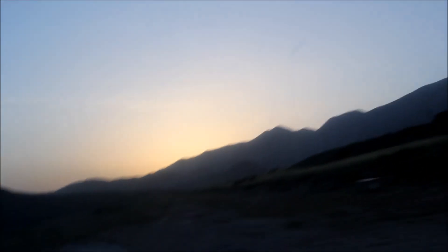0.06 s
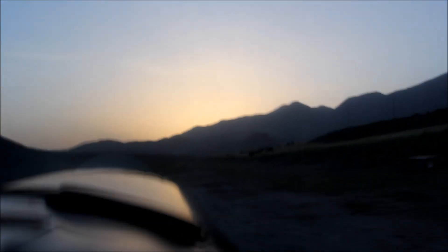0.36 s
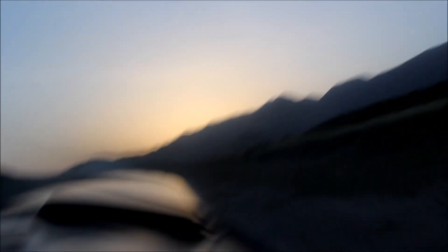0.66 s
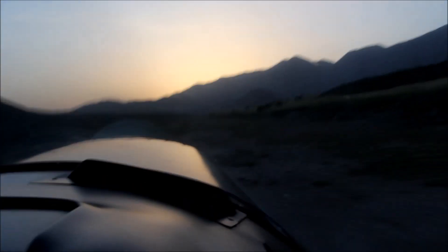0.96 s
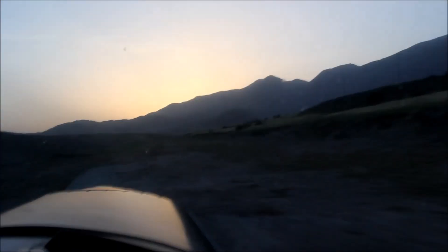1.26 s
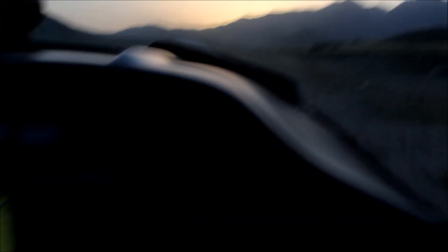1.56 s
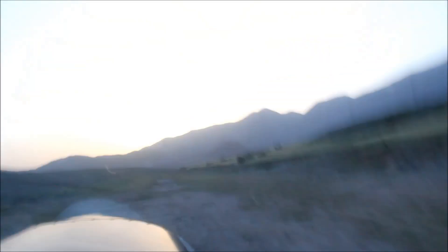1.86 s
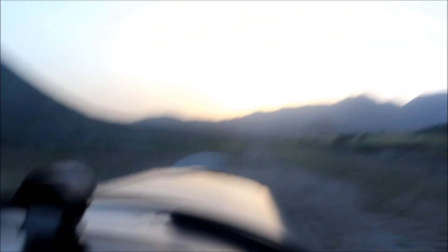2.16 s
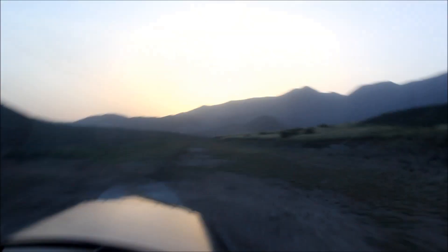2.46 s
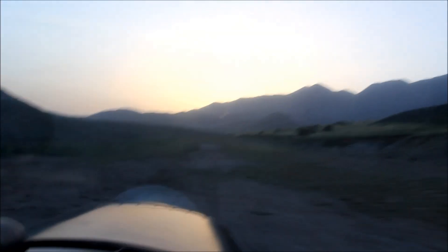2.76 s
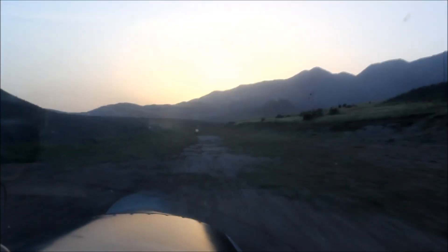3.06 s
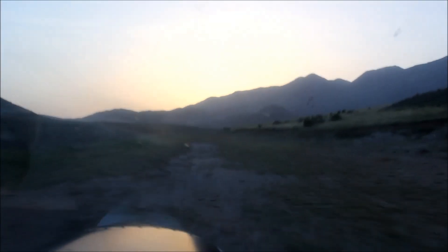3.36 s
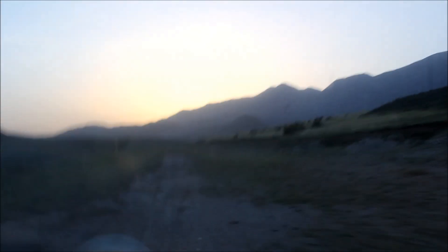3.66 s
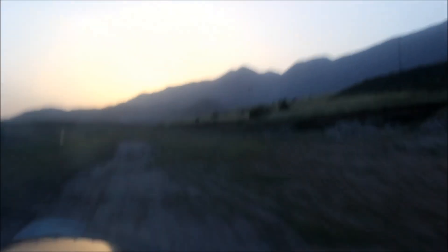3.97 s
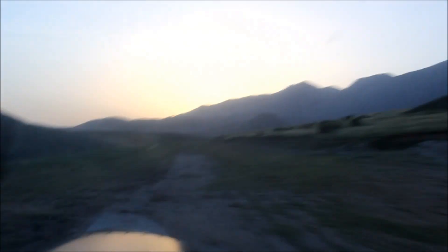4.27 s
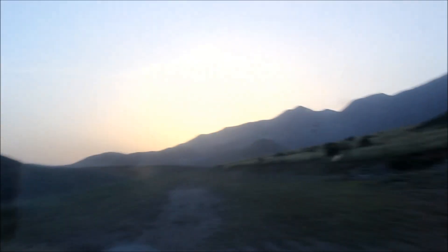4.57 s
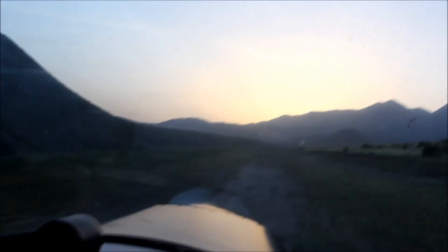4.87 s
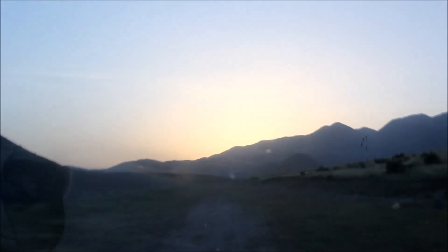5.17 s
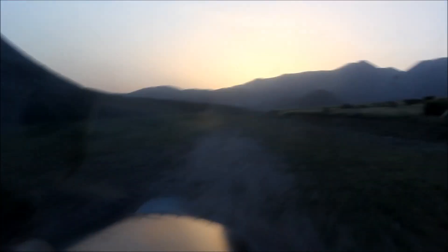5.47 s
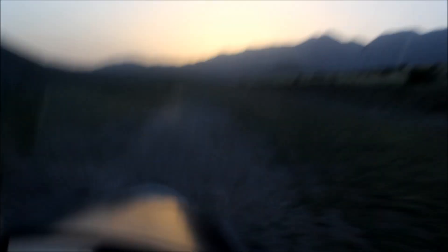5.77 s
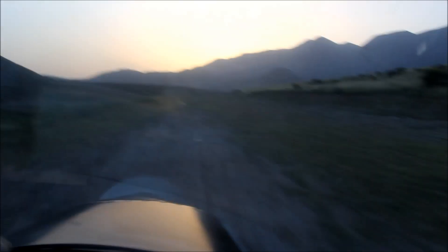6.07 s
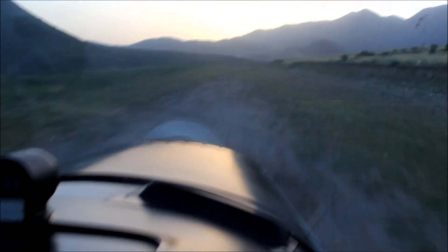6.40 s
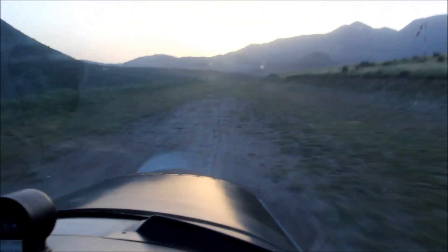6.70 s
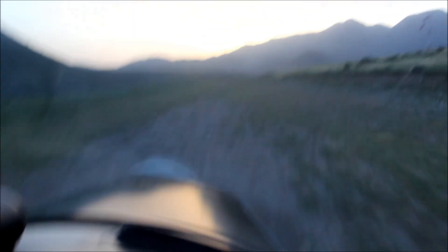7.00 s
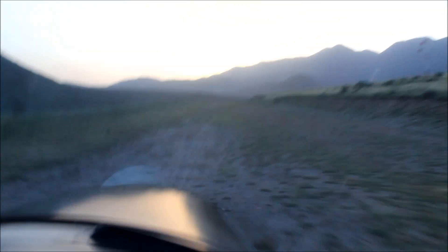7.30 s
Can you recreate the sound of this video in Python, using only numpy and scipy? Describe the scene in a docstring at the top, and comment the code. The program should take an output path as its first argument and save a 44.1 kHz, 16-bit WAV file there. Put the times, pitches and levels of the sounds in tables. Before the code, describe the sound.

A low, booming rumble fills the cabin of a light aircraft rolling over rough grass, heard from the seat for about seven seconds. The throttled-back engine throbs within it, while air and grass rush along the fuselage. At 0.2 seconds the landing gear thumps, with panel knocks and a short buzz. Loose fittings clack rapidly and unevenly until about 2.8 seconds, with more gear thumps at 1.3 and 2.1. A deep boom swells near 0.5, 1.4 and 2.2 seconds, and a gap whistles faintly between 0.6 and 2.1. The rattles thin around 3 seconds as the rumble continues, then pick up after 4. Dull panel knocks come in a quick run from 4.6 to 5.6 seconds, ending in a thump and buzz. More knocks follow at 6, then lighter clacks and a last thump at 7.2. Grit ticks faintly under the wheels in patches throughout.

```python
"""The cabin of a light aircraft rumbles and booms as it rolls over a rough grass strip, throttled back.
Jolts from the wheels and the firings of four unequal cylinders ring the cabin's resonances, and the
deepest one swells when the airframe heaves. Loose fittings clack, often in step with the engine,
panels knock and buzz, and the landing gear thumps over bumps. Behind it all, air and grass rush
along the fuselage, a gap whistles faintly and grit ticks under the wheels."""
import sys
import numpy as np
from scipy import signal
from scipy.fft import rfft, irfft, next_fast_len
from scipy.io import wavfile
from scipy.ndimage import uniform_filter1d

SR = 44100
rng = np.random.default_rng(int(sys.argv[2]) if len(sys.argv) > 2 else 0)


def wav_record(signal):
    """Record a signal, one row per channel, as 16-bit PCM in the file named by sys.argv[1]."""
    frames = np.transpose(np.atleast_2d(signal))
    bounded = np.clip(frames, -1, 1)
    # unit amplitude maps onto the largest positive 16-bit level
    quanta = np.round(bounded * 32767).astype(np.int16)
    wavfile.write(sys.argv[1], SR, quanta)


N = 323694
TIME = np.arange(N) / SR
LEAD = SR // 100  # samples of a strike before its peak

# Levels are relative: each layer adds its own trim.
# air and grass along the fuselage: t/s, level/dB
RUSH_LEVEL = [(0, -25), (.24, -26.5), (.35, -28), (.7, -32), (1.35, -28), (1.7, -33.5), (1.98, -29),
              (2.09, -27), (2.35, -31), (3.05, -29), (3.68, -31.5), (4.22, -27), (4.55, -31.5),
              (5.3, -28.5), (5.93, -32.5), (6.08, -29), (6.22, -27.5), (6.45, -30), (6.75, -28.5),
              (7, -33.5), (7.3, -31)]
# treble riding on that rush, highest early in the roll: t/s, level/dB
RUSH_TREBLE = [(0, 0.5), (.22, 0.5), (.34, 1), (1.1, 0), (2.1, -1.5), (2.6, -2.5), (3.1, -5), (3.9, -4.5),
               (5.2, -6.5), (5.7, -4), (6.2, -6), (7.3, -3)]
# EQ curves for the body of the rush, its hiss and the fizz of dry stalks: f/Hz, level/dB
AIR_EQ = [(200, -49), (380, 2.5), (520, 1.5), (600, -2), (730, -0.5), (800, -5.5), (865, -1.5), (930, -4.5),
          (1100, -6), (1500, -12.5), (2200, -17), (3400, -23.5), (6000, -33), (12000, -71)]
HISS_EQ = [(700, -14), (1800, 11), (3300, 4), (4500, -1), (5700, -4.5), (7000, -8), (10500, -17.5),
           (12200, -29), (16500, -44)]
FIZZ_EQ = [(2500, -23), (5500, -2), (8000, 0.5), (10600, -2.5), (12200, -9), (14500, -13), (16500, -23)]
# air whistling at a gap: t/s, f/Hz, level/dB
GAP_WHISTLE = [(0, 1450, -54), (.62, 1340, -36), (.78, 1310, -37), (1.15, 1320, -33.5), (1.3, 1290, -53),
               (1.7, 1250, -42), (1.9, 1250, -41), (2.05, 1170, -39), (2.3, 1230, -63)]
# patches of grit: t/s, length/s
GRIT_PATCHES = [(.4, .3), (1.3, .2), (1.9, .2), (2.4, .5), (3.32, .26), (3.84, .17), (4.28, .2), (4.7, .15),
                (5.2, .35), (6.08, .3), (6.5, .35)]
# loose panels buzzing after a jolt: t/s, level/dB, f/Hz, width/Hz, length/s
PANEL_BUZZES = [(0, -43.5, 1980, 200, 0.31), (0.216, -28.5, 900, 1000, .065),
                (0.418, -35.5, 2360, 2200, 0.09), (1.936, -32, 1880, 450, 0.026),
                (2.07, -27.5, 3550, 600, 0.01), (4.157, -26, 900, 900, 0.033),
                (4.422, -39, 2310, 450, 0.022), (5.579, -32, 830, 450, 0.34), (6.046, -31, 790, 700, 0.086)]
# panels knocking against the frame: t/s, level/dB, treble lift/dB
PANEL_KNOCKS = [(0.2274, -15, 2), (.239, -14, 5), (.253, -21, 0), (0.8584, -17, -2), (.979, -23, 1),
                (1.2631, -17, 2), (1.941, -19, 2), (2.082, -18, 0), (2.21, -16.5, -4), (2.3902, -16.5, 5),
                (2.613, -21, 3), (2.626, -19, -4), (4.0436, -26, -1), (4.1638, -19, 3), (4.1725, -18, -4),
                (4.587, -13, -5), (4.713, -20, -2), (4.7696, -15.5, 3), (4.96, -18, 4), (5.0232, -11.5, -2),
                (5.091, -18.5, 2), (5.148, -14, 2), (5.2151, -16, 1), (5.2768, -16, 3), (5.3391, -16.5, 0),
                (5.409, -16, -2.5), (5.4679, -22, -1), (5.5354, -17, -8), (5.5653, -18, -4),
                (6.0178, -18, 0), (6.0511, -21, -5), (6.0747, -18, 4), (6.11, -23, 10)]
# loose fittings, often one clack to an engine cycle: t/s, level/dB, top end/dB
FITTING_CLACKS = [(.2265, -20.5, -18), (0.256, -20.5, -15), (0.4786, -22.5, -18), (.5557, -30, -10),
                  (0.6025, -25.5, -10), (.61, -33, -10), (0.663, -23, -14), (.679, -23.5, -19),
                  (.734, -21, -10.5), (0.794, -23, -18), (0.857, -22.5, -8), (.9098, -23, -14),
                  (0.9783, -17.5, -16), (1.0284, -24, -15), (1.0975, -23, -15), (1.158, -25.5, -15),
                  (1.2181, -18, -8), (1.2632, -20.5, -11), (1.5002, -22, -10), (1.5117, -25, -29),
                  (1.578, -26.5, -13), (1.6218, -21.5, -14), (1.6911, -21, -14), (1.709, -27.5, -15),
                  (1.768, -31, -13), (1.8176, -27, -7), (1.9382, -22.5, -29), (2.0263, -28, -15),
                  (2.0702, -21, -10), (2.0822, -21, -12), (2.1897, -22.5, -25), (2.2092, -20.5, -14),
                  (2.568, -35, -10), (2.6136, -22.5, -10), (2.6242, -26.5, -17), (2.688, -24, -12),
                  (2.725, -27, -15), (2.7466, -33, -7), (2.8, -29.5, -13), (3.2659, -30, -15),
                  (3.365, -33, -10), (3.3962, -28, -16), (3.409, -33, -17), (3.5906, -22.5, -14),
                  (3.939, -28, -13), (4.1616, -22, -37), (4.247, -22, -10), (4.3681, -22, -10),
                  (4.3816, -23.5, -20), (4.6177, -31.5, -19), (4.65, -24.5, -20), (4.679, -27, -19),
                  (4.723, -31.5, -11), (4.741, -26.5, -20), (4.967, -30, -21), (5.279, -23, -16),
                  (5.4056, -30, -16), (5.9567, -33.5, -11), (6.0697, -29, -30), (6.192, -31, -13),
                  (6.2074, -31, -7), (6.3389, -34, -11), (6.5695, -31, -10), (6.607, -33, -18),
                  (6.701, -32, -13), (6.7542, -30, -14), (7.179, -31.5, -16)]
NEUTRAL_TOP_DB = -18  # a clack with this top end is neither brightened nor dulled
# EQ curves for a dull knock and a sharp clack: f/Hz, level/dB
KNOCK_EQ = [(150, 7), (500, 2), (950, 1.5), (1600, -4.5), (2200, -17), (4000, -24.5), (9000, -37),
            (16000, -51)]
CLACK_EQ = [(200, 6), (600, 13), (1400, 10), (2300, 3.5), (3600, 4), (4700, -0.5), (5700, -2.5), (7000, -8),
            (10800, -9.5), (12500, -18.5), (15500, -20)]
# the landing gear hitting bumps: t/s, level/dB, f/Hz, decay/s
GEAR_BUMPS = [(.242, -1, 348, 0.011), (0.25, -2, 191, 0.014), (1.274, -2.5, 287, 0.017),
              (2.073, -6, 167, 0.029), (5.636, -9, 244, 0.067), (7.189, -6.5, 225, 0.016)]
# EQ curve of air buffeting the cabin: f/Hz, level/dB
BUFFET_EQ = [(8, -30), (18, -19), (26, -2), (33, -10), (40, -28), (50, 2), (58, 7.5), (68, -4.5),
             (100, 6.5), (130, -9), (180, -1.5), (400, -29), (2000, -100)]
# low resonances between heaves: t/s, deepest level/dB, upper level/dB
BOOM_LEVELS = [(0, -24, -16.5), (.28, -19.5, -21), (.75, -25.5, -18), (1.05, -20.5, -16.5),
               (1.25, -18, -19.5), (1.5, -22, -18), (1.83, -27.5, -24), (2.1, -20.5, -17),
               (2.45, -19.5, -21), (2.7, -18.5, -19.5), (3.1, -16.5, -25), (3.48, -26, -22),
               (3.69, -27, -31), (3.87, -19.5, -20.5), (4.27, -22, -22.5), (4.55, -25, -23),
               (4.75, -16, -23.5), (5.25, -26, -17.5), (5.52, -22, -20), (5.75, -19, -26),
               (6.05, -31, -19.5), (6.42, -26.5, -20.5), (6.75, -22, -23.5), (7, -31, -17), (7.2, -19, -18)]
# heaves of the airframe that feed the deepest boom: t/s, length/s, boost/dB
AIRFRAME_HEAVES = [(.45, 0.087, 14.5), (1.37, 0.24, 11), (2.14, 0.16, 6), (2.38, 0.22, 1),
                   (6.53, 0.16, 6.5)]
# engine cycle rate, four firings to a cycle: t/s, f/Hz
ENGINE_RATE = [(0, 16.3), (.6, 16.28), (1.6, 15.6), (2.7, 16.3), (4.6, 16.2), (5, 15.6), (6.5, 15.9),
               (7.34, 16.5)]
# the four cylinders in firing order: level/dB
CYLINDER_LEVELS = [1, -6.5, -1, -7.5]
# cabin resonances: f/Hz, base width/Hz, level/dB
CABIN_MODES = [(160, 40, -3), (226.3, 25.4, 1.5), (246, 31.6, -1), (292, 32.5, -2.5), (324, 21.5, -2.5),
               (345.7, 26.4, -3.5), (453, 106, -16)]
# ground shaking the cabin, least while the wheels run light: t/s, level/dB
GROUND_SHAKE = [(0, -22), (.22, -20), (.45, -18), (.95, -27), (1.5, -22), (1.97, -27), (2.16, -17),
                (2.58, -21), (2.95, -17.5), (3.7, -19), (4.45, -20), (4.68, -20.5), (4.9, -18.5),
                (6.2, -18), (6.48, -19), (7.02, -19.5), (7.3, -16.5)]
# rougher stretches that add to the shaking: t/s, length/s, boost/dB
ROUGH_STRETCHES = [(.215, 0.057, 8.5), (1.25, 0.23, 6), (2.98, 0.43, 2), (3.79, 0.16, 4), (4.07, 0.39, 5.5),
                   (4.97, 0.41, 1.5), (5.63, 0.17, 2), (6.56, 0.37, 4)]


def gain_of(db):
    return 10 ** (np.asarray(db) / 20)


def unit_rms(x):
    return x / np.sqrt(np.mean(x ** 2) + 1e-20)


def automation(rows):
    """One curve over the whole scene for each column after the time."""
    s, *columns = np.transpose(rows)
    return [np.interp(TIME, s, c) for c in columns]


def swells(rows, rise_s, fall_s):
    """A boost curve in dB: each event rises, holds and falls."""
    boost = np.zeros(N)
    for s, length, db in rows:
        release = s + max(length, rise_s)
        boost += db * np.interp(TIME, [s, s + rise_s, release, release + fall_s], [0, 1, 1, 0])
    return boost


def eq(x, points):
    """Filters x through an EQ curve."""
    f, db = np.transpose(points)
    size = next_fast_len(len(x))
    hz = np.fft.rfftfreq(size, 1 / SR)
    response = gain_of(np.interp(np.log(hz + 1), np.log(f + 1), db))
    return irfft(rfft(x, size) * response, size)[:len(x)]


def drift(rate_hz):
    """Smooth random modulation of rms 1."""
    size = next_fast_len(N)
    hz = np.fft.rfftfreq(size, 1 / SR)
    spectrum = rfft(rng.standard_normal(size)) / (1 + (hz / rate_hz) ** 2) ** 2
    return unit_rms(irfft(spectrum, size)[:N])


def resonate(x, hz, width_hz):
    """Two matching resonators in series; their pitch can follow a curve."""
    carrier = np.exp(2j * np.pi * np.cumsum(hz * np.ones(len(x))) / SR)
    pole = np.exp(-np.pi * width_hz / SR)
    for _ in range(2):
        x = 2 * (carrier * signal.lfilter([1 - pole], [1, -pole], x / carrier + 1e-18)).real
    return x


def add(mix, s, sound):
    """Mixes a sound in at time s."""
    part = mix[max(round(s * SR), 0):][:len(sound)]
    part += sound[:len(part)]


def strike(colour, rise_s, crack_s, tail_s, tail_db):
    """A noise hit that builds and lets go, with a tail for the small cabin's dense echoes."""
    t = np.arange(-LEAD, SR // 10) / SR
    age = np.maximum(t, 0)
    attack = np.exp(np.minimum(t, 0) / rise_s)
    envelope = attack * (np.exp(-age / crack_s) + gain_of(tail_db) * np.exp(-age / tail_s))
    burst = eq(envelope * rng.standard_normal(len(t)), colour)
    fade = signal.windows.tukey(len(t), .1)
    return unit_rms(burst * fade) * np.sqrt(np.mean(envelope ** 2))


def stalk_level():
    """Level in dB of dry stalks brushing past: it follows the rush and its treble."""
    return automation(RUSH_LEVEL)[0] + 1.08 * automation(RUSH_TREBLE)[0] - 23


def grit_ticks(per_s=34, trim_db=1):
    """Patches of grit under the wheels set off faint ticks, just above the fizz of the stalks."""
    out, fizz_db = np.zeros(N), stalk_level()
    for place, chance in rng.random((round(per_s * N / SR), 2)):
        s = place * N / SR
        tick = strike(FIZZ_EQ, rise_s=0.00062, crack_s=0.0013, tail_s=.006, tail_db=1.0)
        if any(start < s < start + length for start, length in GRIT_PATCHES):
            accent_db = 3 * min(-np.log(chance), 2)
            add(out, s, gain_of(fizz_db[int(place * N)] + trim_db + accent_db) * tick)
    return out


def whistle(trim_db=-1):
    """Air at a gap sings in a narrow, wavering band of noise."""
    hz, db = automation(GAP_WHISTLE)
    band = resonate(rng.standard_normal(N), hz, width_hz=200)
    return unit_rms(band * gain_of(2.2 * drift(25))) * gain_of(db + trim_db)


def rush(pulses, air_db=1, hiss_db=-10, fizz_db=-1, throb=0.11, throb_s=0.0081):
    """Air and grass sweep along the fuselage: three bands of noise that throb with the engine."""
    level, treble = automation(RUSH_LEVEL)[0], automation(RUSH_TREBLE)[0]
    beat = signal.lfilter([1], [1, -np.exp(-1 / (throb_s * SR))], pulses)
    sway = (1 + throb * unit_rms(beat - beat.mean())) * gain_of(1.35 * drift(30))
    air = unit_rms(eq(rng.standard_normal(N) * gain_of(0.55 * drift(180)), AIR_EQ) * sway)
    hiss = unit_rms(eq(rng.standard_normal(N), HISS_EQ) * sway)
    # stalks hit in clumps, so the fizz is the least even
    fizz = unit_rms(eq(rng.standard_normal(N), FIZZ_EQ) * sway * gain_of(1.3 * drift(120)))
    return (air * gain_of(level + air_db)
            + hiss * gain_of(level + 1.53 * treble + hiss_db)
            + fizz * gain_of(stalk_level() + fizz_db))


def panel_buzzes():
    """A loose panel chatters against its frame and rings at one rough pitch."""
    out = np.zeros(N)
    for s, db, hz, width_hz, length in PANEL_BUZZES:
        chafe = rng.standard_normal(SR)[:round(length * SR)]
        ring = unit_rms(resonate(chafe, hz, width_hz))
        add(out, s, gain_of(db) * ring * signal.windows.tukey(len(ring), .5))
    return out


def panel_knocks(trim_db=-6, lag_s=0.00149, shelf_hz=1500):
    """Panels knock against the frame, mostly dull, some with a bright edge."""
    out = np.zeros(N)
    hz, level = np.transpose(KNOCK_EQ)
    shelf = np.clip(np.log2(hz / shelf_hz), 0, 1)
    for s, db, lift_db in PANEL_KNOCKS:
        colour = np.transpose([hz, level + lift_db * shelf])
        knock = strike(colour, rise_s=0.0023, crack_s=0.0057, tail_s=0.05, tail_db=-10.5)
        add(out, s + lag_s - LEAD / SR, gain_of(db + trim_db) * knock)
    return out


def fitting_clacks(trim_db=4, lag_s=.0015, shelf_hz=4000, halo_db=-18,
                   thud_db=2, thud_hz=135, thud_s=0.0079):
    """Loose fittings clack, harder contacts shorter and brighter; the frame thuds back."""
    out, t = np.zeros(N), np.arange(SR // 10) / SR
    hz, level = np.transpose(CLACK_EQ)
    shelf = np.clip(np.log2(hz / shelf_hz), 0, 1)
    for s, db, top_db in FITTING_CLACKS:
        hardness = top_db - NEUTRAL_TOP_DB
        ripple_db = rng.standard_normal(len(hz))  # gives each hit its own colour
        colour = np.transpose([hz, level + 0.86 * hardness * shelf + ripple_db])
        stretch = np.exp(-0.044 * hardness)
        clack = strike(colour, rise_s=0.00034 * stretch, crack_s=0.0004 * stretch,
                       tail_s=0.0078, tail_db=-8.5)
        # a soft hiss swelling and fading around each clack
        halo = strike(HISS_EQ, rise_s=0.0056, crack_s=0.013, tail_s=.015, tail_db=-15.5)
        thud = np.exp(-t / thud_s) * np.sin(2 * np.pi * thud_hz * rng.uniform(1.0, 1.11) * t)
        add(out, s + lag_s - LEAD / SR, gain_of(db + trim_db) * (clack + gain_of(halo_db) * halo))
        add(out, s, gain_of(db + trim_db + thud_db) * thud)
    return out


def gear_thumps(rise_s=0.0028):
    """Each bump rings the landing gear with a short, low note."""
    out, t = np.zeros(N), np.arange(SR // 4) / SR
    for s, db, hz, decay_s in GEAR_BUMPS:
        envelope = (1 - np.exp(-t / rise_s)) * np.exp(-t / decay_s)
        add(out, s, gain_of(db) * envelope * np.sin(2 * np.pi * hz * t))
    return out


def buffet(level_db=-26.5):
    """Air buffets the cabin: a steady bed of low noise."""
    return unit_rms(eq(rng.standard_normal(N), BUFFET_EQ)) * gain_of(level_db)


def boom(level_db, hz, wander_hz, flutter_db):
    """One low resonance kept going by the shaking, unsteady in pitch and strength."""
    cycles = np.cumsum(hz + wander_hz * drift(23.3)) / SR
    flutter = gain_of(flutter_db * drift(45))
    return unit_rms(np.sin(2 * np.pi * cycles) * flutter) * gain_of(level_db)


def cabin_booms():
    """Three low resonances boom; in a heave the deepest swells and settles on one pitch."""
    deep_db, upper_db = automation(BOOM_LEVELS)
    heave_db = swells(AIRFRAME_HEAVES, rise_s=0.063, fall_s=0.083)
    unrest = np.clip(gain_of(-1.6 * heave_db), .12, 1)  # 1 between heaves, small within them
    deep = boom(deep_db + heave_db + 2.4 * unrest * drift(5.7) - 3,
                hz=81 + 5 * unrest, wander_hz=2 + 9 * unrest, flutter_db=2.5)
    high = boom(upper_db - 6, hz=166.2, wander_hz=12, flutter_db=2.5)
    middle = boom(upper_db + 2 * drift(33) - 2.5, hz=125.4, wander_hz=9.43, flutter_db=4)
    return deep + middle + high


def engine_firings(uneven_db=3):
    """Four unequal cylinders fire in turn, one pulse each."""
    cycles = np.cumsum(automation(ENGINE_RATE)[0]) / SR
    stroke = np.floor(cycles * len(CYLINDER_LEVELS)).astype(int)
    onsets = np.flatnonzero(np.diff(stroke))
    cylinder_db = np.take(CYLINDER_LEVELS, stroke[onsets], mode="wrap")
    pulses = np.zeros(N)
    pulses[onsets] = gain_of(cylinder_db + uneven_db * rng.standard_normal(len(onsets)))
    return pulses


def cabin_rumble(pulses, engine_db=-4, trim_db=0.61, widen=1.53, lumpy_db=1.5):
    """Tyre jolts and engine firings ring the cabin's resonances."""
    drive = rng.standard_normal(N) + gain_of(engine_db) * unit_rms(pulses)
    body = sum((-1) ** k * gain_of(db) * resonate(drive, hz, widen * width)
               for k, (hz, width, db) in enumerate(CABIN_MODES))
    # levelled flat, so that the ground alone sets the swells
    body /= np.sqrt(uniform_filter1d(body ** 2, size=2600) + 1e-12)
    rough_db = swells(ROUGH_STRETCHES, rise_s=0.014, fall_s=0.044)
    ground_db = automation(GROUND_SHAKE)[0] + rough_db + lumpy_db * drift(24)
    return body * gain_of(ground_db + trim_db)


def scene():
    """The cabin as heard from the seat, in mono."""
    pulses = engine_firings()
    roll = cabin_rumble(pulses) + buffet() + cabin_booms() + rush(pulses) + whistle()
    rattles = fitting_clacks() + panel_knocks() + panel_buzzes() + gear_thumps() + grit_ticks()
    return (roll + rattles)[None]


def record(dry):
    """Hard-clips the largest peaks, then cuts the highs above 16 kHz."""
    lowpass = signal.firwin(511, 16000, window=("kaiser", 9), fs=SR)
    return signal.oaconvolve(np.clip(dry, -1, 1), lowpass[None], "same")


dry = scene()
out = record(dry)
wav_record(out)
```